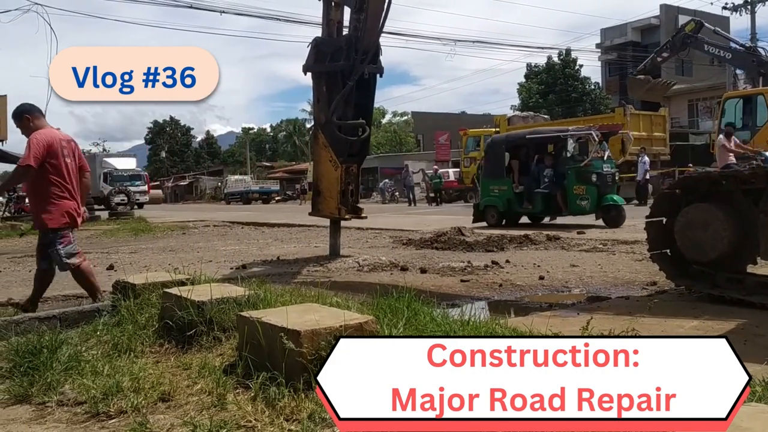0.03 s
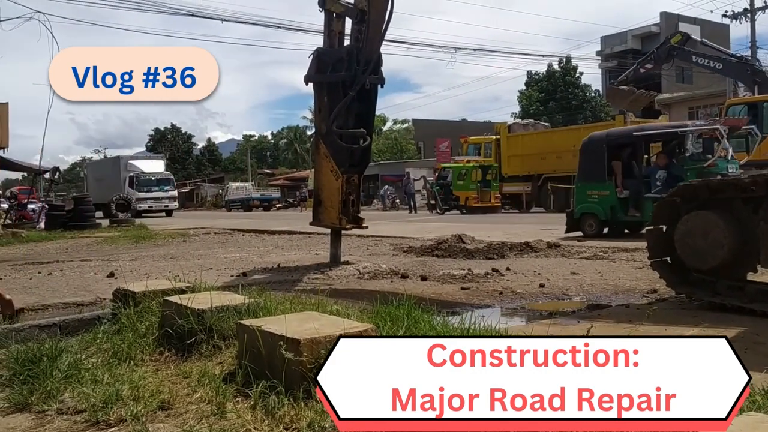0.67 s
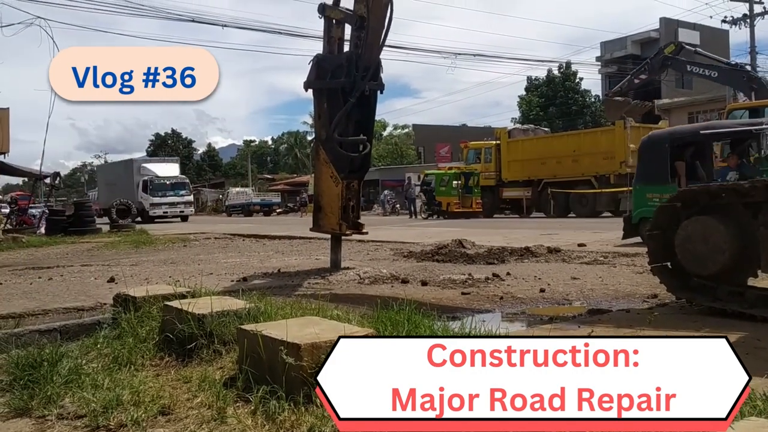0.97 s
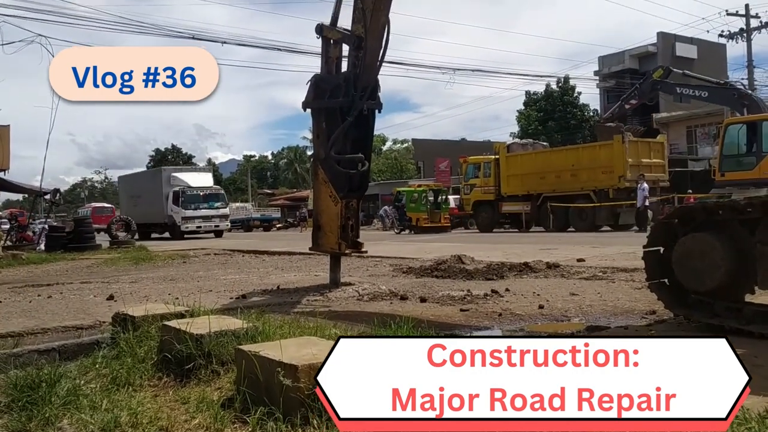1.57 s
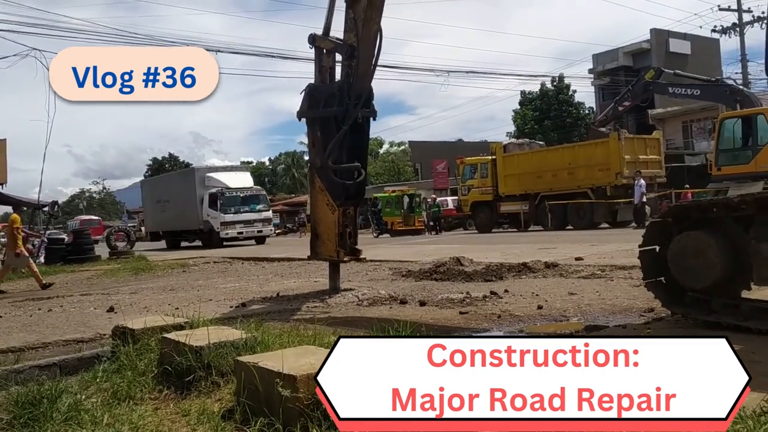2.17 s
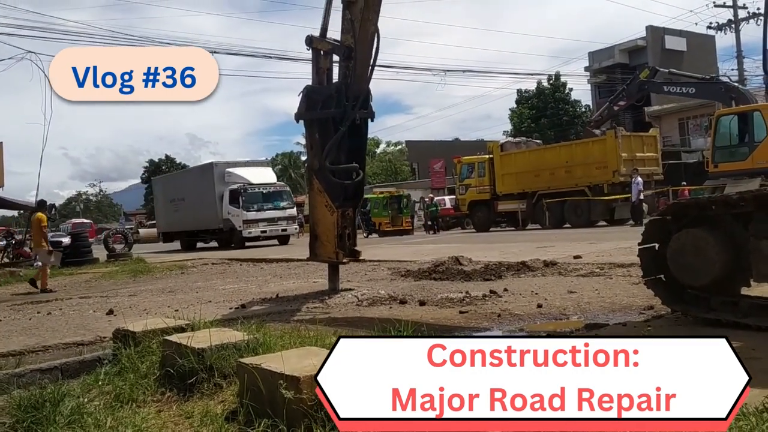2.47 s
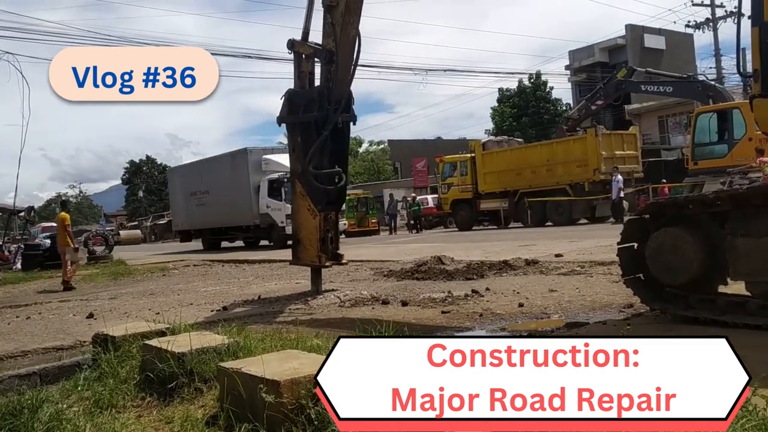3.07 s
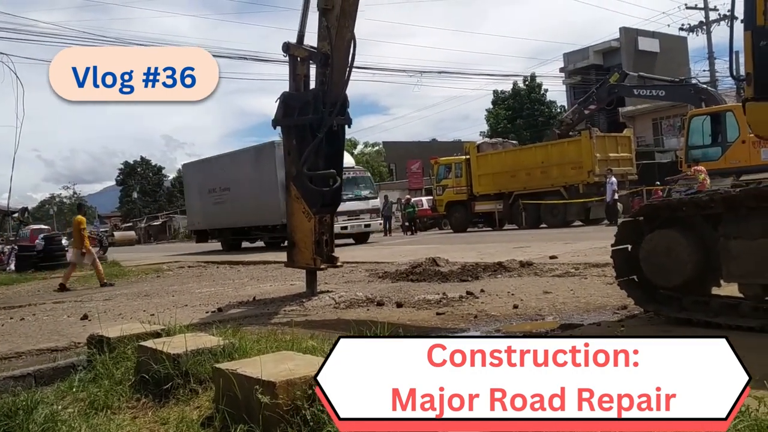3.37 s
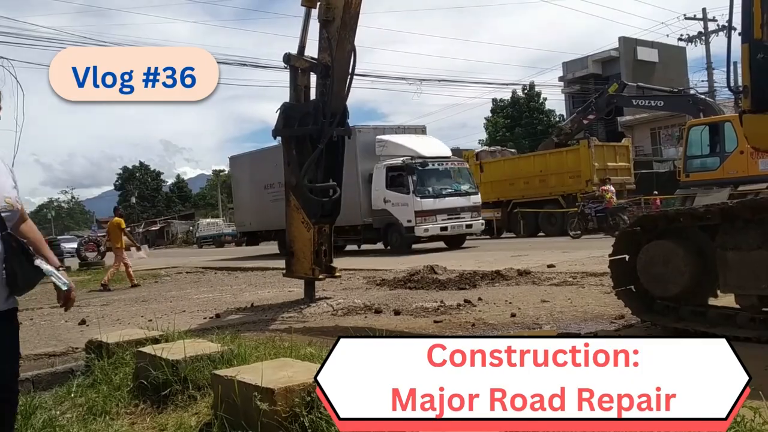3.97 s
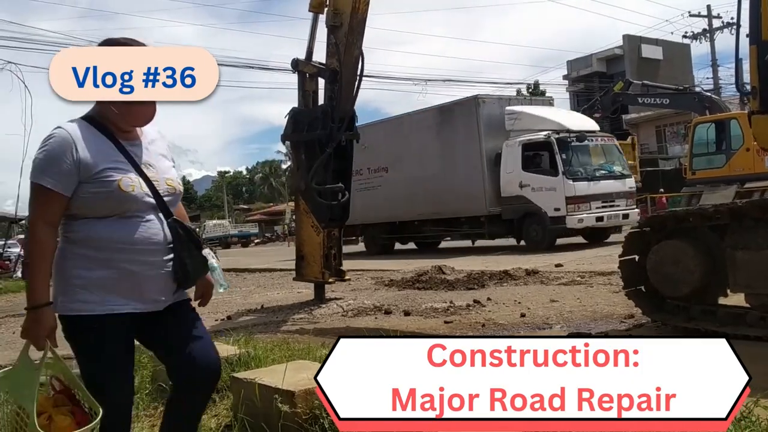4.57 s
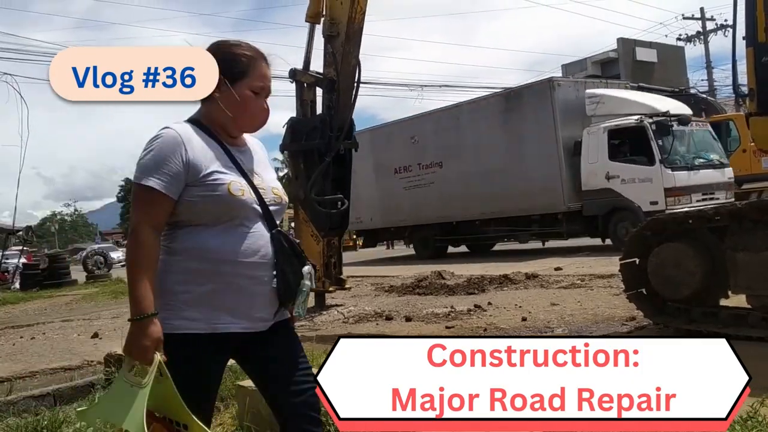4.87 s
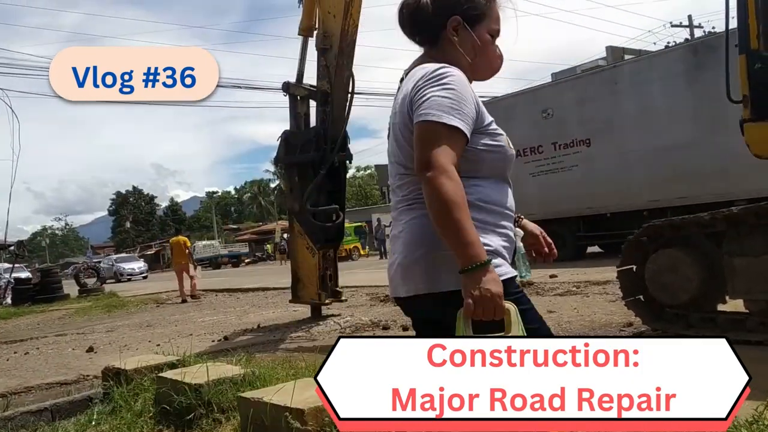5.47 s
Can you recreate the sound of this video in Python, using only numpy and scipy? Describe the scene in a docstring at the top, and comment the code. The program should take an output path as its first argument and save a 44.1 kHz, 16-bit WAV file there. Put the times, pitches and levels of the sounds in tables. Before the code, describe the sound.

Outdoors beside a street, a steel chisel hammers pavement in a fast, even rhythm over the low drone of a diesel excavator. At first the strikes are loud and ringing, with a heavy casing rattling after each one. The rattle soon dies away, and the blows turn tighter and gradually quieter without changing pace. Buildings give a brief echo, and distant traffic forms a soft background wash.

```python
"""A hydraulic breaker on a road

An excavator's breaker hammers a road about 4.3 times a second. A valve ticks, a piston strikes the
steel chisel, and the chisel jumps and rings, less so as it bites in. The loose housing clanks after
the first blows. The street's buildings echo, and the diesel engine hums over distant traffic."""
import sys
import numpy as np
from scipy import signal
from scipy.fft import rfft, irfft, next_fast_len
from scipy.io import wavfile
from scipy.ndimage import uniform_filter1d, minimum_filter1d, map_coordinates

SR = 44100
rng = np.random.default_rng(int(sys.argv[2]) if len(sys.argv) > 2 else 0)


def persist_wave(psi):
    """Save psi, clipped to +-1, as 16-bit WAV."""
    counts = np.round(np.clip(psi, -1, 1) * 32767).astype(np.int16)
    wavfile.write(sys.argv[1], SR, np.atleast_2d(counts).T)


N = 247621
T = np.arange(SR // 2) / SR  # seconds within one hit

# The piston's blows. Each row: start in seconds, strength in dB.
PISTON_BLOWS = [(-.014, -8), (.2152, -9.5), (0.4425, -8.5), (0.6738, -12), (0.9045, -11), (1.1331, -9.5),
                (1.3633, -9), (1.5917, -11), (1.8208, -11), (2.053, -11), (2.2845, -12.5), (2.5146, -15),
                (2.746, -14.5), (2.979, -14), (3.2132, -14.5), (3.45, -14.5), (3.6849, -14), (3.9179, -12),
                (4.1535, -12.5), (4.387, -14.5), (4.6197, -15.5), (4.851, -20), (5.0811, -23.5),
                (5.311, -21.5), (5.539, -20.5)]
# The notes the chisel rings at. Each row: pitch in Hz, ring time in seconds (to fade by 60 dB),
# then relative levels in dB when struck, on the rebound and in the air.
CHISEL_NOTES = [(2492, .11, -11.5, -10, -7), (3548, .06, -22, -3.5, -16), (3657, .05, -21, -1.5, -18),
                (4770, .08, -7, -9, -4), (4870, .03, -13, -15, -11), (4945, .03, -12, -12, -2.5),
                (5980, .08, -19, -21, -26), (6240, .085, -6.5, -10, -18), (6315, .06, -11, -12, -19),
                (7030, .04, -10, -15, -24), (7205, .07, -2.5, -6, -13), (7380, .025, -4, -15, -22),
                (7580, .04, -9, -15, -23)]
# How strongly the chisel rings by bending. Each row: time in seconds, relative level in dB.
BEND_LEVELS = [(.2, -32.5), (1.7, -42.5), (3.2, -41.5), (4, -35.5), (4.9, -37.5), (5.5, -44)]
# The road slab's notes. Each row: pitch in Hz, ring time in seconds, relative level in dB.
SLAB_NOTES = [(450, .15, -10), (684, .2, 0), (729, .2, 2.5), (790, .14, -1), (857, .18, -1.5),
              (933, .12, -7), (1186, .12, -6), (1330, .13, -4), (1700, .11, -11)]
# The housing's bounces after a blow. Each row: delay in seconds, relative level in dB,
# time in the scene in seconds when that bounce starts to die away.
HOUSING_BOUNCES = [(.048, -14.5, .64), (.09, -18.5, .66), (.129, -32.5, 1.4)]
# Where the housing rings. Each row: pitch in Hz, width in Hz, relative level in dB.
HOUSING_RESONANCES = [(644, 87, -7), (846, 45, 2), (945, 43, -2), (1010, 30, -1.5), (1189, 64, 4.5),
                      (1337, 74, -10), (1726, 120, -4.5), (2340, 250, -6)]
# Engine and pump tones. Each row: pitch in Hz, level in dB relative to the drone.
HUM_TONES = [(263.5, -1), (448, -16), (559, -14)]

# The tone colours of the noises. Each row: frequency in Hz, relative level in dB.
CRACK_COLOUR = [(100, -35.5), (500, 1), (1500, -1), (2400, -2.5), (2900, -6), (3900, -5), (4750, 2.5),
                (5400, -5.5), (6250, 11), (6650, 2.5), (7200, 3.5), (7700, 2.5), (9000, -7)]  # the sharp crack of a hit
CONTACT_COLOUR = [(300, -24.5), (1200, -8), (3800, -16.5), (4800, 6), (5500, -19.5), (6250, 3),
                  (6650, -10.5), (7250, -3.5), (7700, 0), (9000, -3)]  # the shock running through the steel
TICK_COLOUR = [(200, -29.5), (1200, -39), (1650, -13.5), (2000, -33.5), (2500, -10), (3600, -16.5),
               (4100, -4.5), (4700, 2.5), (5250, -4), (5800, -5.5), (6500, -5.5), (7100, -4.5), (8000, -7)]  # the valve
OIL_COLOUR = [(100, -4.5), (450, -1.5), (800, -5.5), (1600, -7), (4000, -17)]  # the oil driving the piston
RATTLE_COLOUR = [(100, -1.5), (400, 2), (1200, 3), (2300, -4.5), (3500, 1), (5000, -4.5), (8000, -14)]  # the clatter of housing and pavement
THUD_COLOUR = [(20, -0.5), (60, -6.5), (90, 5), (130, -2.5), (260, -1.5), (400, -11.5), (800, -8.5),
               (3000, -68)]  # the road's low thud
EXHAUST_COLOUR = [(25, -15.5), (60, -3.5), (130, 0), (180, -4), (225, -9.5), (265, 3.5), (310, -2),
                  (400, -11), (1000, -47.5)]  # the exhaust's drone
RUMBLE_COLOUR = [(12, -39), (20, 4.5), (43, -2.5), (97, 2.5), (210, -5), (258, -8), (304, -7.5), (386, -17),
                 (700, -28), (910, -48.5), (1540, -120)]  # the diesel's deep rumble
STREET_COLOUR = [(240, -24), (400, 7), (680, 3), (1720, -9), (2480, -10.5), (3090, -13), (4100, -19),
                 (4730, -6.5), (5450, -13.5), (6290, -14.5), (7630, -25.5), (8470, -34.5), (8800, -59),
                 (11400, -83), (19400, -120)]  # the wash of street noise

# How the background swells and sinks. Each row: time in seconds, relative level in dB.
RUMBLE_LEVELS = [(0.0, -32), (0.48, -29.5), (3.84, -35), (3.98, -31.5), (5.6, -32.5)]
DRONE_LEVELS = [(0.0, -37.5), (3.21, -37.5), (4.31, -34), (5.18, -46), (5.6, -42)]
STREET_LEVELS = [(0.0, -32), (0.45, -28), (1.67, -38.5), (5.6, -39)]

# The street's echo. Each row: frequency in Hz, seconds to fade by 60 dB.
ECHO_TIMES = [(150, 0.82), (800, 0.37), (3000, 0.71), (6500, 0.57), (9000, 0.58)]
# How well the microphone hears. Each row: frequency in Hz, gain in dB.
MIC_RESPONSE = [(10, 0.5), (7600, 1), (7900, -14), (8300, -18), (8700, -37.5), (9000, -23)]

BITE_START_S, BITE_END_S = 1.92, 3.8  # the loose chisel bites into the road until it sits firmly
REBOUND_DB = (-18, -42)  # relative level when loose, then when firm
AIRBORNE_DB = (-12.5, -21.5)  # likewise, for the ringing in the air
FLIGHT_S = .035  # how long the loose chisel stays in the air
LEAN_S, FLIGHT_SHRINK_S = 1.3, 2.2  # the arm leans in and jumps shorten: start, time to shrink to 37%
FULL_BLOW_DB = -11.5  # the strength that counts as a full blow
SETTLE_DB_PER_S = 60  # how fast the housing's bouncing dies away
BEND_HZ, FIRING_HZ, TOP_HZ = 3301, 92, 8958  # bending chisel, engine firing, highest treble kept


def breaker():
    """The piston drives the chisel into the road; as the chisel bites, it jumps and rings less."""
    out = np.zeros(N)
    for start, strike_db in PISTON_BLOWS:
        force_db = strike_db - FULL_BLOW_DB
        bite = (BITE_START_S, BITE_END_S)
        rebound_db = np.interp(start, bite, REBOUND_DB) + 3 * rng.standard_normal()
        airborne_db = np.interp(start, bite, AIRBORNE_DB) + 3 * rng.standard_normal()
        airborne_db += 0.43 * force_db  # harder blows ring louder
        flight_s = FLIGHT_S * np.exp(-max(start - LEAN_S, 0) / FLIGHT_SHRINK_S)
        ring = chisel(strike_db, rebound_db, airborne_db, flight_s, at_time(BEND_LEVELS, start))
        add(out, start - .0232, valve(strike_db))
        add(out, start, outdoors(ring, wet_db=-15, rise_s=0.011))
        add(out, start, amp(-22.5 + 0.14 * force_db) * outdoors(road(), wet_db=-6.5, rise_s=0.028))
    return out


def chisel(strike_db, rebound_db, airborne_db, flight_s, bend_db):
    """The chisel is struck, jumps against its holder and rings freely until it lands again."""
    _, _, struck, bounced, airborne = np.transpose(CHISEL_NOTES)
    out = amp(strike_db + 3) * steel_ring(struck, lambda ring_s: fade(0.0014, ring_s), scatter_db=0.5)
    out += amp(strike_db) * coloured(CRACK_COLOUR) * fade(rise_s=0.0015, ring_s=0.022)
    # the shock runs up and down the steel for a few milliseconds
    out += amp(strike_db + 2) * coloured(CONTACT_COLOUR) * np.exp(-((T - .003) / 0.0036) ** 2)
    rebound = steel_ring(bounced, lambda ring_s: fade(0.00033, ring_s), scatter_db=1)
    add(out, .0098, amp(rebound_db + 6) * rebound)
    # nothing quiets the chisel in the air; the road chokes it on landing
    swell = 1 - np.exp(-T / (0.12 * flight_s))
    choke = amp(-60 * np.maximum(T - flight_s, 0) / 0.017)
    out += amp(airborne_db - 4) * steel_ring(airborne, lambda _: swell * choke, scatter_db=1.8)
    # a slanted hit makes the chisel ring by bending
    return out + amp(bend_db + 19) * tone(BEND_HZ, blur=8.9) * fade(rise_s=0.014, ring_s=0.16)


def steel_ring(levels_db, shape, scatter_db):
    """The steel's notes, a little different each time; shape turns a ring time into a loudness curve."""
    return sum(amp(db - scatter_db * rng.standard_normal()) * tone(hz, blur=10.6) * shape(ring_s)
               for (hz, ring_s, *_), db in zip(CHISEL_NOTES, levels_db))


def valve(strike_db):
    """Just before the blow, the valve ticks and oil rushes in to push the piston."""
    tick = amp(-11 + 0.41 * strike_db) * coloured(TICK_COLOUR) * fade(rise_s=0.00083, ring_s=0.078)
    oil = amp(-27.5) * coloured(OIL_COLOUR) * fade(rise_s=0.0088, ring_s=0.31)
    return tick + oil


def road():
    """The tip crushes the pavement, and the slab knocks with its own notes."""
    knock = sum(amp(db - 7.5) * tone(hz, blur=7.1) * fade(0.0013, ring_s)
                for hz, ring_s, db in SLAB_NOTES)
    crunch = coloured(RATTLE_COLOUR) * fade(rise_s=0.00026, ring_s=0.057)
    crack = amp(4) * coloured(CRACK_COLOUR) * fade(rise_s=0.0043, ring_s=0.21)
    thud = amp(-1.5) * coloured(THUD_COLOUR) * fade(rise_s=0.00086, ring_s=0.29)
    return knock + crunch + crack + thud


def housing():
    """Until the chisel bites, the heavy casing bounces and clanks after each blow."""
    out = np.zeros(N)
    for start in [s for s, _ in PISTON_BLOWS if s < BITE_START_S]:
        build_db = np.interp(start, (0, .2), (-4, 0))  # the bouncing starts out weaker
        for delay, loose_db, settles_s in HOUSING_BOUNCES:
            db = loose_db + build_db - SETTLE_DB_PER_S * max(start - settles_s, 0)
            clank = amp(2) * resonant(HOUSING_RESONANCES) * fade(rise_s=0.0015, ring_s=0.21)
            rattle = amp(1) * coloured(RATTLE_COLOUR) * fade(rise_s=0.0012, ring_s=0.16)
            add(out, start + delay, amp(db) * outdoors(clank + rattle, wet_db=-15.5, rise_s=0.0052))
    return out


def diesel():
    """The engine rumbles, its firing makes a low tone, and pump and exhaust join in a drone."""
    t = np.arange(N) / SR

    def wavering(hz, db):
        return amp(db + 1.6 * wobble(11)) * np.sin(2 * np.pi * hz * t + 0.83 * wobble(13))

    rumble_db = at_time(RUMBLE_LEVELS, t) - 0.34 + 0.84 * wobble(5.1)
    rumble = amp(rumble_db) * coloured(RUMBLE_COLOUR, size=N)
    hum = sum(wavering(hz, db) for hz, db in HUM_TONES)
    exhaust = amp(-1.5) * coloured(EXHAUST_COLOUR, size=N)
    drone = amp(at_time(DRONE_LEVELS, t) + 2.5) * (hum + exhaust)
    return rumble + wavering(FIRING_HZ, db=-35) + drone


def street():
    """A wash of noise, louder early on while the housing's clanks echo, settling to distant traffic."""
    level_db = at_time(STREET_LEVELS, np.arange(N) / SR) - 2.7 + .4 * wobble(1.9)
    return amp(level_db) * coloured(STREET_COLOUR, size=N)


def pressure_bump():
    """One slow push of pressure at the microphone."""
    out = np.zeros(N)
    progress = T / 0.053
    push = (progress - 1) * np.exp(-progress) * (1 - np.exp(-T / 0.0014))
    add(out, .674, amp(-10) * push)
    return out


def outdoors(sound, wet_db, rise_s):
    """The sound plus its echo off road, machines and buildings; wet_db is the echo's level."""
    hz, t, spectrum = signal.stft(rng.standard_normal(len(T)), SR, nperseg=256)
    decay = amp(-60 * t / at_frequency(ECHO_TIMES, hz)[:, None])
    tail = signal.istft(spectrum * decay, SR, nperseg=256)[1][:len(T)]
    tail *= 1 - np.exp(-(T / rise_s) ** 2)
    echo = signal.fftconvolve(sound, tail / np.linalg.norm(tail))[:len(T)]
    return sound + amp(wet_db) * echo


def amp(db):
    """Turns decibels into a number to multiply by."""
    return 10 ** (np.asarray(db) / 20)


def at_time(points, seconds):
    """Reads a table between its times."""
    return np.interp(seconds, *np.transpose(points))


def at_frequency(points, hz):
    """Reads a table between its frequencies, on a log scale."""
    frequencies, values = np.transpose(points)
    return np.interp(np.log(hz + 1), np.log(frequencies + 1), values)


def wobble(rate):
    """A smooth curve through rate random values a second."""
    return map_coordinates(rng.standard_normal(int(N * rate / SR) + 4), [np.arange(N) * rate / SR])


def noise(gain, size):
    """Noise of a standard strength, shaped by a gain for each frequency."""
    spectrum = rfft(rng.standard_normal(size)) * gain(np.fft.rfftfreq(size, 1 / SR))
    shaped = irfft(spectrum, size)
    return shaped / np.sqrt(np.mean(shaped ** 2) + 1e-20)


def coloured(colour, size=len(T)):
    """Noise with the tone colour of a table."""
    return noise(lambda hz: amp(at_frequency(colour, hz)), next_fast_len(size))[:size]


def resonant(peaks):
    """Noise that rings around the given pitches."""
    def gain(hz):
        return sum((-1) ** k * amp(db) * 1j * hz * width / (pitch ** 2 - hz ** 2 + 1j * hz * width)
                   for k, (pitch, width, db) in enumerate(peaks))
    return noise(gain, len(T))


def fade(rise_s, ring_s):
    """A quick rise, and a fall of 60 dB every ring_s seconds."""
    return (1 - np.exp(-T / rise_s)) * amp(-60 * T / ring_s)


def tone(hz, blur):
    """One note; blur sets how much its wave drifts as the contact shifts."""
    drift = blur * np.cumsum(rng.standard_normal(len(T))) / np.sqrt(SR)
    return np.sin(2 * np.pi * (hz * T + rng.random()) + drift)


def add(track, seconds, sound):
    """Mixes a sound into a track at the given time, dropping what does not fit."""
    start = round(seconds * SR)
    part = sound[max(-start, 0):][:max(len(track) - max(start, 0), 0)]
    track[max(start, 0):][:len(part)] += part


def scene():
    """Everything heard from the roadside, in one channel."""
    return (breaker() + housing() + diesel() + street() + pressure_bump())[None]


def record(dry):
    """The microphone loses the top treble, and the highest peaks are turned down."""
    size = next_fast_len(N + SR // 2)
    hz = np.fft.rfftfreq(size, 1 / SR)
    heard = irfft(rfft(dry, size) * amp(at_frequency(MIC_RESPONSE, hz)), size)
    needed_gain = .95 / np.maximum(np.abs(heard), .95)
    smooth_gain = uniform_filter1d(minimum_filter1d(needed_gain, size=89), size=89)  # about 2 ms
    return irfft(rfft(heard * smooth_gain) * (hz < TOP_HZ), size)[:, :N]


dry = scene()
out = record(dry)
persist_wave(out)
```